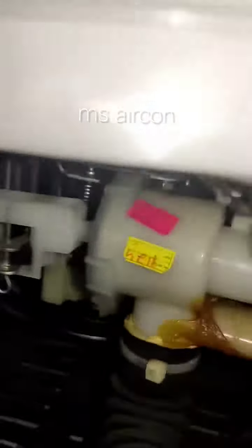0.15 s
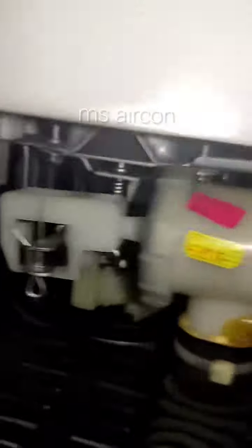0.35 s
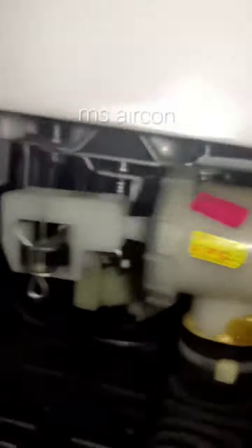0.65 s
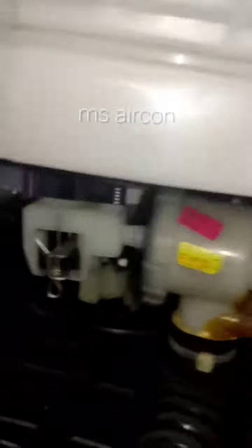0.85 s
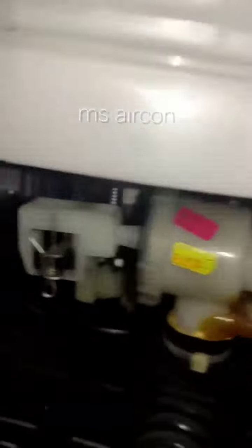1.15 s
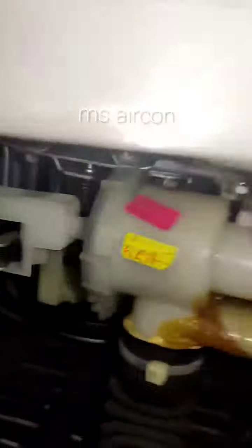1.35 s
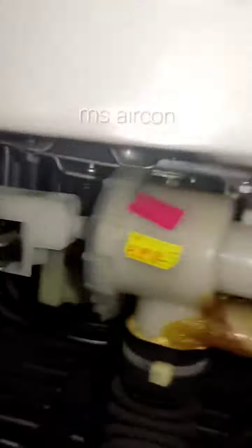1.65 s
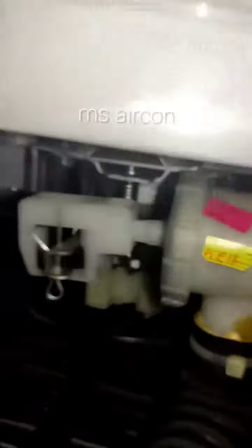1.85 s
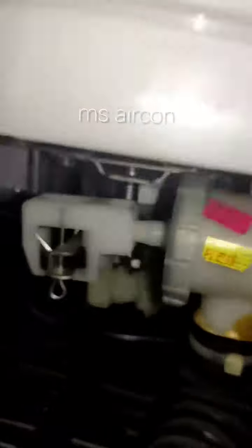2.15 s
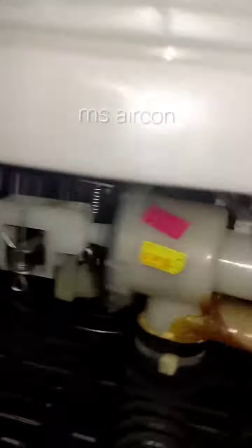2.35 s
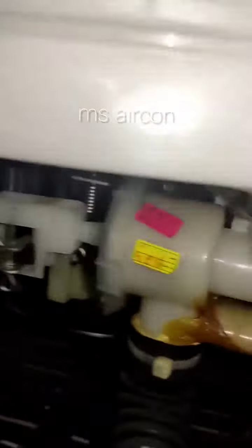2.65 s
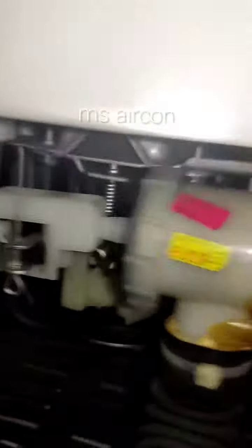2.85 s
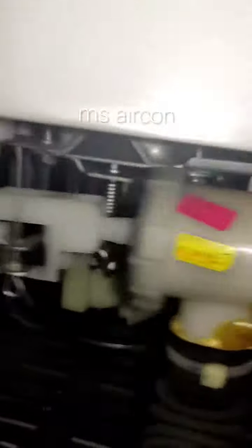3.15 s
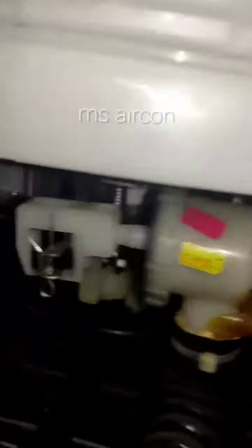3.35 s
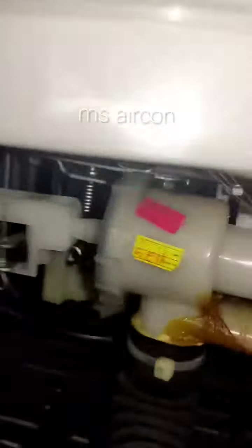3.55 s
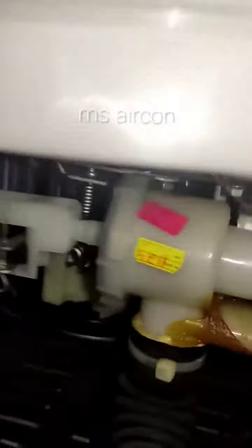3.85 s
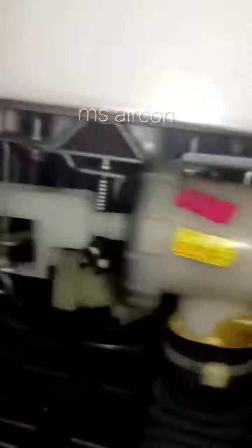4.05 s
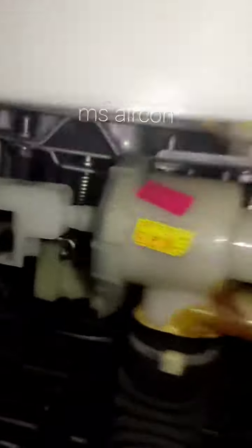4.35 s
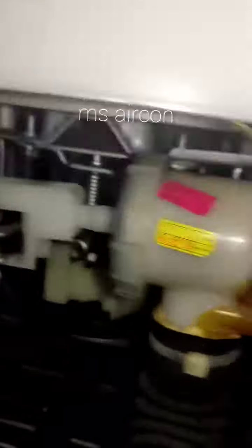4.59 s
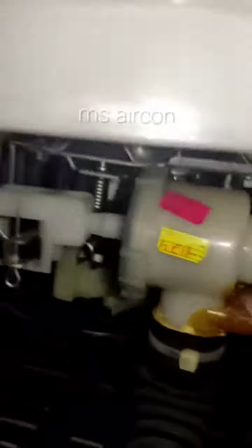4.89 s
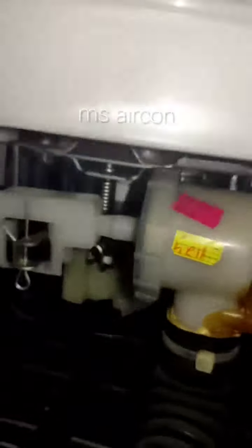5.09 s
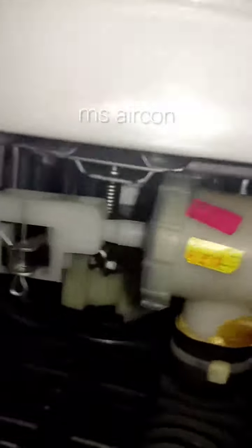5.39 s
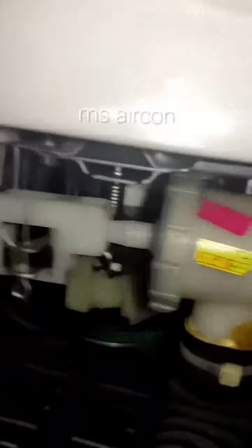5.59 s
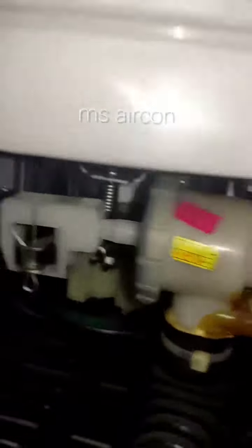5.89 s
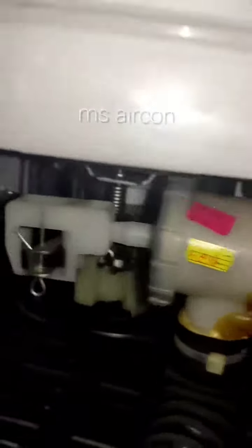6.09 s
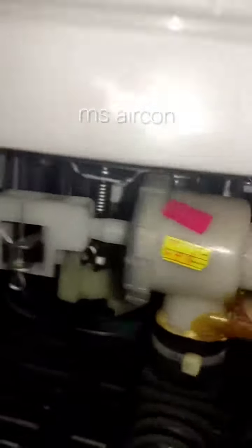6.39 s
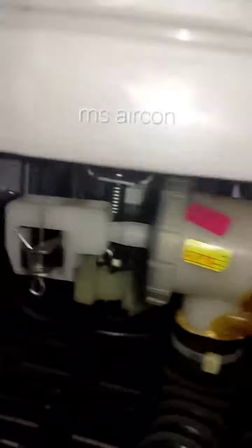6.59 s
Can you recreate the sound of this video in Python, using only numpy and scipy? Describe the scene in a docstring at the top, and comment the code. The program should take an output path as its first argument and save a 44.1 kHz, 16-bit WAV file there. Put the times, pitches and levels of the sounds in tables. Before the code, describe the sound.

From 0 s a washing machine runs close to the microphone: a steady low mains hum with a stronger buzzy overtone, a deep rumble swaying about three times a second, a grainy whirr and fine rattling of loose metal. Light ticks and soft bumps are scattered through it, with a knock near 0.9 s, a cluster around 1.5 s and a sharp bright tick at 2.3 s. A faint whine sags in pitch towards 3.2 s, when a heavy clunk clangs and booms, and the hum almost vanishes before returning weaker. Short gritty rubs come around 3.4, 3.9, 4.3 and 4.6 s, with a smaller clunk at 3.85 s. The rumble recovers near 4 s, with deep lurches and crowded soft thuds until about 5.4 s. It then continues unevenly and more quietly, with loose knocks around 5.7, 6.1 and 6.4 s, still running at the end, 6.7 s.

```python
"""A steady mains hum and a swaying rumble come first: a top-loading washing machine heard from close by.
The motor hums from the pull on its iron; the drive shakes the tub's resonances, whirrs and buzzes loose parts.
The drain valve's lever, pin and spring tick and knock inside the cabinet, as bursts of filtered contacts.
Midway a heavy clunk booms through decaying low modes and the hum drops. Something rubs in a few
stick-and-slip strokes, a lesser clunk falls among them, and the tub runs on more quietly with loose knocks."""
import sys
import numpy as np
from scipy import signal
from scipy.fft import rfft, irfft, next_fast_len
from scipy.io import wavfile
from scipy.ndimage import uniform_filter1d

SR = 44100
rng = np.random.default_rng(int(sys.argv[2]) if len(sys.argv) > 2 else 0)


def wav_record(signal):
    """Record a signal, one row per channel, as 16-bit PCM in the file named by sys.argv[1]."""
    frames = np.transpose(np.atleast_2d(signal))
    bounded = np.clip(frames, -1, 1)
    # unit amplitude maps onto the largest positive 16-bit level
    quanta = np.round(bounded * 32767).astype(np.int16)
    wavfile.write(sys.argv[1], SR, quanta)


N = 296793
T = np.arange(N) / SR

# the motor sheds its load at the heavy clunk: moment and duration in seconds
CHANGE_S, CHANGE_TAKES_S = 3.24, 0.11
# effort of the drive: time_s, effort_db
EFFORT = [(0, 0), (1.4, 0), (2.2, -0.5), (3.28, -1), (3.42, -10), (3.76, -7), (4.0, -0.5), (4.2, -3.5),
          (5.05, -3.5), (5.55, -7), (6.0, -2.5), (6.35, -4), (6.73, -4)]
# spectrum of the ringing metal linkage and loose parts: frequency_hz, relative_db
METAL = [(900, -45), (2000, -14), (2800, -6.5), (3250, 1.5), (3800, -7), (5000, -8), (5700, -3.5),
         (6200, 1.5), (6800, 0.5), (7400, 1), (7900, -21)]
# spectrum of the plastic housing: frequency_hz, relative_db
PLASTIC = [(200, -5), (330, 6), (420, -20.5), (510, 2.5), (650, -7.5), (900, -3.5), (1100, -11.5),
           (1600, -11.5), (1950, -15.5), (2350, -16), (2800, -18.5), (4200, -32), (7700, -29.5)]


def from_db(db):
    """Decibels to gain."""
    return 10 ** (np.asarray(db) / 20)


def rms_one(x):
    """Scale to unit rms."""
    return x / np.sqrt(np.mean(x ** 2) + 1e-20)


def evened(x, seconds):
    """Hold the loudness steady over the given time, near unit rms."""
    power = uniform_filter1d(x ** 2, max(int(seconds * SR), 2))
    return x / np.sqrt(np.abs(power) + 1e-12)


def in_time(rows):
    """Each column of a curve, joined by straight lines."""
    time_s, *columns = np.transpose(rows)
    return [np.interp(T, time_s, column) for column in columns]


def switched(levels_db, settles_s):
    """The loaded level before the change gives way to the light one."""
    return np.interp(T, [CHANGE_S, CHANGE_S + settles_s], levels_db)


def follows(law, control_db):
    """A level that moves in proportion to its control; law = (dB at a control of 0 dB, dB per dB)."""
    db, slope = law
    return db + slope * control_db


def drift(rate_hz):
    """Slow random wander of spread 1: low-passed noise, drawn at every 40th sample."""
    step = 40
    pole = np.exp(-2 * np.pi * step * rate_hz / SR)
    noise = rng.standard_normal(N // step + 2002)
    slow = signal.lfilter([1], [1, -2 * pole, pole * pole], noise)[2000:]  # drop the filter's start-up
    return np.interp(np.arange(N) / step, np.arange(len(slow)), rms_one(slow))


def coloured(x, spectrum):
    """Causal (minimum-phase) filter with the given spectrum; white noise keeps its power."""
    size = 2 * next_fast_len(N // 2 + SR // 4)
    hz, db = np.transpose(spectrum)
    octave = np.log2(np.maximum(np.fft.rfftfreq(size, 1 / SR), 1))
    # past either end the spectrum falls 20 dB per octave
    beyond = np.abs(octave - np.clip(octave, np.log2(hz[0]), np.log2(hz[-1])))
    gain = rms_one(from_db(np.interp(octave, np.log2(hz), db) - 20 * beyond))
    # folding the cepstrum forward in time makes the phase minimal
    cepstrum = irfft(np.log(gain))
    cepstrum[1:size // 2] *= 2
    cepstrum[size // 2 + 1:] = 0
    return irfft(rfft(x, size) * np.exp(rfft(cepstrum)))[:N]


def resonance(x, hz, width_hz):
    """One resonance, filtered twice for steep skirts; white noise keeps its power."""
    b, a = signal.iirpeak(hz, hz / (width_hz * np.pi / 2), fs=SR)
    once = signal.lfilter(b, a, x + 1e-18)
    return signal.lfilter(b, a, once) * np.sqrt(SR / (np.pi * width_hz))


def grains(per_s, spread_db):
    """Dense tiny contacts of uneven size and random sign; rms 1."""
    sizes = from_db(spread_db * np.minimum(rng.exponential(1, N), 4)) * rng.choice([-1, 1], N)
    return rms_one(sizes * (rng.random(N) < per_s / SR))


def blows(times, levels_db, t60s, crack_db, crack_s, rise_s):
    """Each blow is a short chatter of contact followed by dense, dying reflections in the cabinet."""
    power = np.zeros(N)
    for start_s, db, t60 in zip(times, levels_db, t60s):
        start = round(start_s * SR)
        age = T[:N - start][:SR // 2]
        reflections = from_db(-60 * age / max(t60, .02))
        chatter = from_db(crack_db) * np.exp(-age / crack_s)
        rise = 1 - np.exp(-age / rise_s)
        power[start:][:len(age)] += (from_db(db) * (reflections + chatter) * rise) ** 2
    return np.sqrt(power) * evened(grains(per_s=5000, spread_db=0.5), seconds=0.001)


def cabinet(x):
    """The enclosure's panels and cavities lift narrow bands, one after another, and let them ring on."""
    # panel and cavity resonances: frequency_hz, width_hz, lift_db
    panels = [(328.6, 20, 3), (573, 45, 2.5), (666.5, 19, 5.5), (861, 87, 4), (997, 30, 6), (1254, 59, 6),
              (1420, 43, 2.5), (1610, 38, 5.5), (1820, 38, 4.5), (2130, 130, 3), (2375, 16, 6),
              (3190, 78, 3), (3450, 41, 4), (7030, 110, 6.5), (7420, 73, 6.5), (7484, 63, 2.5)]
    for hz, width_hz, lift_db in panels:
        b, a = signal.iirpeak(hz, hz / width_hz, fs=SR)
        x = x + (from_db(lift_db) - 1) * signal.lfilter(b, a, x)
    return x


def motor(waver_db, wobble_rad):
    """The iron is pulled twice each mains cycle; the swaying load makes the hum waver."""
    # overtones of the hum: multiple_of_mains, relative_db
    partials = [(4, -1.5), (6, -25), (12, -26.5)]
    mains_hz = 50
    # the hum all but stops when the load is shed, then comes back weaker
    dip_depth_db, return_s = 11.5, 0.12
    since = T - CHANGE_S - CHANGE_TAKES_S
    dip_db = switched((0, dip_depth_db), CHANGE_TAKES_S) * np.exp(-np.maximum(since, 0) / return_s)
    hum_db = switched((-16, -23), CHANGE_TAKES_S) - dip_db
    # the overtones take longer to settle
    overtone_db = switched((-18.5, -32.5), settles_s=1.15) - dip_db + 0.4 * drift(5.4)
    phase = 2 * np.pi * mains_hz * T + wobble_rad * drift(1.0)
    overtones = 0
    for multiple, db in partials:
        start_phase = rng.uniform(0, 2 * np.pi)
        overtones = overtones + from_db(db) * np.sin(round(multiple) * phase + start_phase)
    hum = from_db(hum_db) * np.sin(2 * phase) + from_db(overtone_db) * overtones
    return np.sqrt(2) * hum * from_db(waver_db * drift(4.8))


def whine(width_hz, level_db, labour_db):
    """A thin, broken tone that sags as the drive slows; it grows with effort and as the drive labours."""
    # pitch following the drive's speed: time_s, pitch_hz
    pitch_curve = [(0, 2230), (2.4, 2160), (3.15, 1950), (3.65, 1795), (4.18, 1950), (5.0, 2200)]
    pitch_hz, = in_time(pitch_curve)
    effort_db, = in_time(EFFORT)
    slowed = (pitch_hz.max() - pitch_hz) / np.ptp(pitch_hz)  # 0 at full speed, 1 at the slowest
    phase = 2 * np.pi * np.cumsum(pitch_hz) / SR
    tone = drift(width_hz) * np.sin(phase) + drift(width_hz) * np.cos(phase)
    return from_db(level_db + effort_db + labour_db * slowed) * tone


def tub_rumble(effort_db):
    """Irregular jostling of the load excites the tub's modes; the rumble swells once a swing on the springs."""
    # tub and cabinet resonances: frequency_hz, width_hz, relative_db
    modes = [(130.7, 10.9, 3), (166.5, 19, 0.5), (219.1, 21.2, -2), (260.7, 18.2, -4.5),
             (324.8, 32.2, -8.5)]
    swing_s, first_swing_s, swing_depth_db = 0.3, 0.34, 1.34
    settles_s = 1.2
    swing_db = swing_depth_db * np.cos(2 * np.pi * (T - first_swing_s) / swing_s)
    level_db = switched((-20, -23), settles_s) + 0.69 * effort_db + swing_db
    bright_db = switched((-2, 3), settles_s) + 0.54 * effort_db
    shake = grains(per_s=500, spread_db=2.5)
    rumble = 0
    for k, (hz, width_hz, db) in enumerate(modes):
        upper = np.clip(np.log2(hz / 160), 0, 1)  # share of the brightness that this mode takes
        mode = from_db(db + upper * bright_db) * resonance(shake, hz, width_hz)
        rumble = rumble + (-1) ** k * mode
    return from_db(level_db) * evened(rumble, seconds=0.096)


def tub_lurches():
    """Wider lurches of the tub swell its deepest resonance."""
    # centre_s, level_db
    swells = [(0.03, -25), (4.0, -29), (4.33, -20.5), (4.63, -24), (4.88, -22.5)]
    spread_s = 0.082
    lurch = sum(from_db(db) * np.exp(-((T - centre_s) / spread_s) ** 2) for centre_s, db in swells)
    return lurch * evened(resonance(rng.standard_normal(N), hz=63.7, width_hz=11), seconds=0.1)


def drive_noise(effort_db):
    """The turning drive keeps up a low drone and a grainy whirr, both moving with its effort."""
    # low drone: frequency_hz, relative_db
    drone_spectrum = [(20, -35.5), (32, -31), (43, -20.5), (54, -16), (66, 3), (73, -7.5), (83, -5),
                      (105, -8), (135, -24.5)]
    # whirr: frequency_hz, relative_db
    whirr_spectrum = [(230, -11.5), (330, 3), (430, 3.5), (570, 0.5), (680, -2), (760, -4.5), (980, -10.5),
                      (1120, -15), (1550, -23.5), (2300, -20.5), (2900, -29), (4200, -36.5), (7700, -33.5)]
    drone = evened(coloured(rng.standard_normal(N), drone_spectrum), seconds=0.2)
    whirr = coloured(grains(per_s=2500, spread_db=0.5), whirr_spectrum) * from_db(1.5 * drift(37))
    drone_db = follows((-26.5, 0.7), effort_db)
    whirr_db = follows((-36, 1), effort_db)
    return from_db(drone_db) * drone + from_db(whirr_db) * whirr


def loose_rattle(gain_db):
    """Loose parts buzz finely: metallic noise with a fast, uneven flutter."""
    # buzz before the overall gain: time_s, level_db
    buzz_curve = [(0.0, -52.5), (0.43, -51), (3.32, -56), (3.5, -79), (3.82, -57), (3.99, -55),
                  (4.37, -65.5), (4.48, -57), (4.59, -56), (4.99, -54), (5.21, -65), (5.4, -59.5),
                  (6.02, -57), (6.35, -62), (6.73, -54)]
    level_db, = in_time(buzz_curve)
    buzz = coloured(rng.standard_normal(N), METAL) * from_db(3.64 * drift(22))
    return from_db(level_db + gain_db) * buzz


def running_tub():
    """The turning drive shakes the tub's resonances, whirrs, and keeps loose parts buzzing."""
    effort_db, = in_time(EFFORT)
    return tub_rumble(effort_db) + tub_lurches() + drive_noise(effort_db) + loose_rattle(gain_db=-2)


def bumps(lowest_hz, ring_s, gain_db, housing_db):
    """Soft, well-damped thuds of the tub, each with a faint clack of the housing."""
    # soft bumps before the gains: start_s, strength_db
    thuds = [(0.534, -11.5), (1.678, -9.5), (2.933, -13), (4.159, -13), (4.232, -9), (4.432, -9.5),
             (4.514, -11.5), (4.695, -14), (4.778, -11.5), (4.881, -19.5), (4.94, -10), (5.068, -13),
             (5.19, -17), (5.384, -14.5), (6.165, -9.5), (6.575, -23.5)]
    times, levels_db = np.transpose(thuds)
    clack = blows(times, levels_db + housing_db, np.full(len(times), 0.07),
                  crack_db=-6, crack_s=0.0066, rise_s=0.0059)
    out = coloured(clack, PLASTIC)
    for start_s, db in thuds:
        age = np.maximum(T - start_s, 0) / ring_s
        swell = age * np.exp(1 - age)
        hz = lowest_hz * rng.uniform(1.0, 1.16)
        out += from_db(db + gain_db) * swell * np.sin(2 * np.pi * hz * (T - start_s))
    return out


def rubbing(catch_db):
    """Stick and slip of a part dragging as the tub swings past: fine grit with coarser catches."""
    # strokes: start_s, length_s, level_db, sag_db_per_s, brightness_db_per_octave
    strokes = [(3.434, 0.11, -29.5, 15, 0), (3.919, 0.25, -28.5, 1, 0.5), (4.286, 0.18, -28, 56, 1.4),
               (4.592, 0.075, -33, 0, 1.7)]
    # rubbed part: frequency_hz, relative_db
    rub_spectrum = [(220, -16), (310, 8), (410, 10.5), (520, -10), (670, 1.5), (830, -0.5), (1150, -18),
                    (1620, -10.5), (2250, -24), (3400, -23.5), (4100, -33.5), (5600, -28.5), (7200, -23.5),
                    (7700, -33.5)]
    attack_s, release_s = 0.016, 0.057
    slips = rms_one(grains(per_s=3000, spread_db=2.5) + grains(per_s=160, spread_db=2))
    slips = slips * from_db(catch_db * drift(30))
    out = np.zeros(N)
    for start_s, length_s, level_db, sag, tilt in strokes:
        age = np.clip(T - start_s, 0, length_s)
        pressure = np.clip(np.minimum(age / attack_s, (length_s - age) / release_s), 0, 1)
        spectrum = [(hz, db + tilt * np.log2(hz)) for hz, db in rub_spectrum]
        out += pressure * from_db(level_db - sag * age) * coloured(slips, spectrum)
    return out


def ticks():
    """The pin and spring touch lightly, and faintly at random in between: metal rings, the housing answers."""
    # touches before each part's own level: start_s, strength_db, ring_t60_s
    touches = [(0.3057, -28, 0.063), (0.3516, -24.5, 0.088), (0.6772, -28, .2), (1.1843, -35, .22),
               (1.461, -32.5, 0.25), (1.7956, -33, 0.29), (2.3166, -13, .085), (2.396, -30.5, .18),
               (2.9146, -39, 0.1), (3.697, -42.5, 0.081), (3.9175, -29.5, 0.12), (4.527, -39, 0.077),
               (4.588, -41, 0.2), (4.6684, -38.5, .24), (4.883, -37.5, 0.2), (4.9596, -36, .055),
               (5.0614, -35.5, .19), (5.186, -39.5, 0.068), (5.2566, -39, 0.23), (5.645, -39, 0.35),
               (5.9432, -40.5, .21), (6.2525, -35.5, .17), (6.599, -32.5, 0.081), (6.646, -35, 0.14)]
    faint_per_s, faint_db, faint_t60_s = 1.5, -44, 0.12  # the strongest faint tick; others up to 5 dB softer
    chance = rng.random((round(faint_per_s * N / SR), 2))
    faint = [(when * T[-1], faint_db - 5 * softer, faint_t60_s) for when, softer in chance]
    start_s, db, t60 = np.transpose(list(touches) + faint)
    touch = blows(start_s, db - 10, t60, crack_db=-2.5, crack_s=0.0062, rise_s=0.0012)
    # the pin's shrill ring grows faster than the touch, the housing's answer only half as fast
    ping_db = follows((2, 2.03), db)
    ping = blows(start_s, ping_db, t60, crack_db=-2, crack_s=0.0046, rise_s=0.0008)
    housing = blows(start_s, 0.5 * db - 17, t60, crack_db=-6, crack_s=0.007, rise_s=0.003)
    shrill = resonance(ping, hz=7370, width_hz=600)
    return coloured(touch, METAL) + shrill + from_db(-5.5) * coloured(housing, PLASTIC)


def knocks():
    """A knock on the valve housing sounds the metal linkage, the plastic and, more slowly, the tub."""
    # knocks before each part's own level: start_s, strength_db, metal_relative_db, ring_t60_s
    hits = [(0.889, -23, -5.5, 0.21), (1.4878, -27.5, -1, 0.042), (1.5274, -25, -7.5, 0.14),
            (1.5557, -32, 4, 0.035), (2.4284, -31.5, -12, 0.079), (3.0647, -26.5, -5, 0.096),
            (3.2404, -18, -5.5, 0.27), (3.256, -21.5, -12, 0.16), (3.3368, -27.5, -11.5, 0.063),
            (3.45, -29, -4, 0.33), (3.493, -30.5, -7.5, 0.12), (3.8181, -35, -2, 0.26),
            (3.8536, -21.5, -4.5, .22), (4.2483, -25, -2, .16), (4.293, -28.5, -7, 0.25),
            (5.0248, -34, 1, 0.14), (5.0982, -31, 1, 0.12), (5.537, -36, 1, 0.19),
            (5.7044, -25.5, 0.5, 0.13), (5.8468, -29, -3, 0.13), (6.0832, -22, -8.5, .13),
            (6.107, -44, 14, 0.062), (6.4291, -25, -6.5, 0.18), (6.486, -35.5, 5.5, 0.12)]
    start_s, db, metal_db, t60 = np.transpose(hits)
    metal = blows(start_s, db + metal_db - 14.0, t60, crack_db=4.5, crack_s=0.013, rise_s=0.00049)
    plastic = blows(start_s, db - 2.5, t60, crack_db=-1.5, crack_s=0.011, rise_s=0.0036)
    # the tub's answer grows about half as fast as the knock
    push_db = follows((-7, 0.48), db)
    push = blows(start_s, push_db, t60, crack_db=3, crack_s=0.0068, rise_s=0.0022)
    tub = from_db(-1.5) * resonance(push, hz=309.3, width_hz=56) + resonance(push, hz=221, width_hz=47)
    return coloured(metal, METAL) + coloured(plastic, PLASTIC) + tub


def jolts(clang_hz, clang_t60_s):
    """A heavy clunk: the bracket clangs at once, the tub's low modes swell and boom."""
    # jolts of the whole tub: start_s, boom_db, clang_db
    clunks = [(3.2379, 7.5, -9.5), (3.853, -3.5, -12.5)]
    # low modes set booming: frequency_hz, relative_db, swell_s, ring_t60_s
    boom_modes = [(129.4, 5.5, 0.074, 0.26), (190.2, -3.5, 0.038, 0.23), (238, -8, 0.032, 0.19),
                  (414, -19, 0.0033, 0.075), (652, -21, .03, 0.21)]
    out, age = np.zeros(N), T[:SR]
    for start_s, boom_db, clang_db in clunks:
        sound = from_db(clang_db - 60 * age / clang_t60_s) * np.sin(2 * np.pi * clang_hz * age)
        for hz, db, swell_s, t60 in boom_modes:
            swell = 1 - np.exp(-(age / swell_s) ** 2)
            decay = from_db(boom_db + db - 60 * age / t60)
            sound = sound + swell * decay * np.sin(2 * np.pi * hz * age)
        out[round(start_s * SR):][:SR] += sound
    return out


def scene():
    """All parts of the machine, heard from close by; tub and contacts sound through the cabinet."""
    drive = motor(waver_db=1.76, wobble_rad=0.021) + whine(width_hz=14, level_db=-65.5, labour_db=11.0)
    tub = running_tub() + bumps(lowest_hz=234.7, ring_s=0.0023, gain_db=-2.0, housing_db=-24.5)
    inside = cabinet(tub + rubbing(catch_db=0.5) + ticks() + knocks())
    return (drive + inside + jolts(clang_hz=850, clang_t60_s=0.059))[None]


def record(dry):
    """Peaks are rounded and the top is cut steeply."""
    cutoff_hz = 7640
    rounded = 0.95 * np.tanh(dry / 0.95)
    low_pass = signal.ellip(10, 0.2, 80, cutoff_hz, fs=SR, output="sos")
    return signal.sosfilt(low_pass, rounded)


dry = scene()
out = record(dry)
wav_record(out)
```